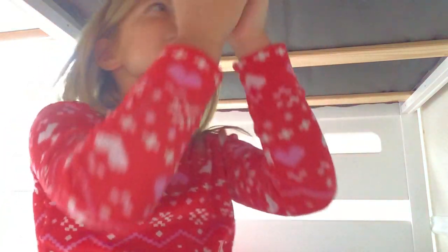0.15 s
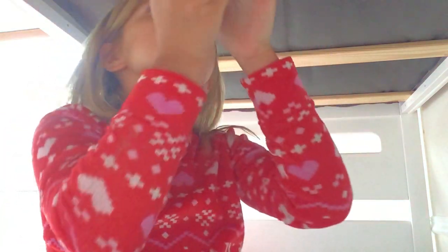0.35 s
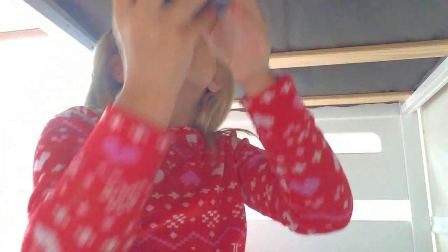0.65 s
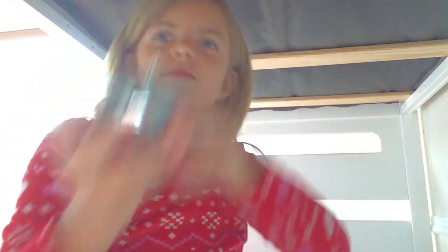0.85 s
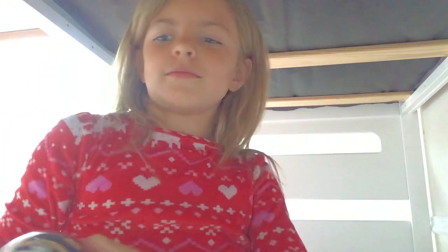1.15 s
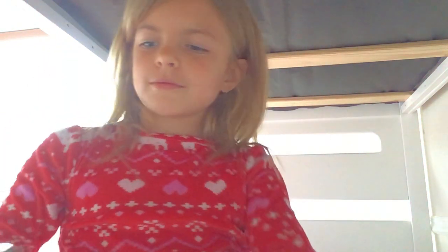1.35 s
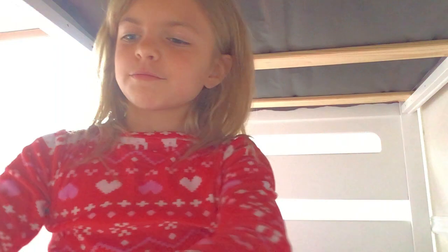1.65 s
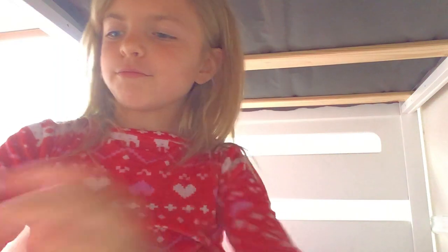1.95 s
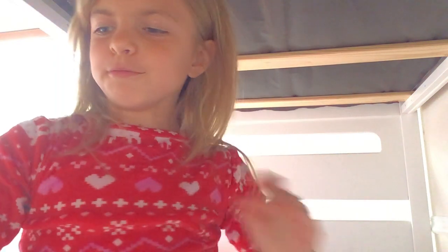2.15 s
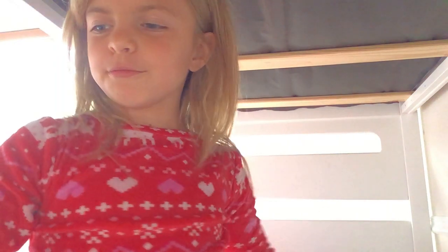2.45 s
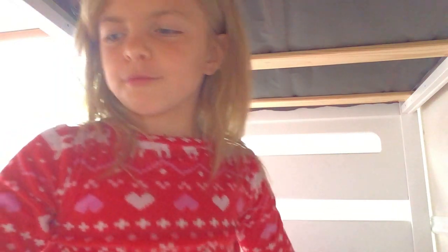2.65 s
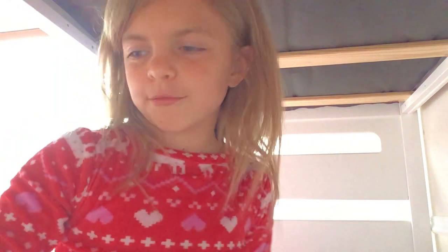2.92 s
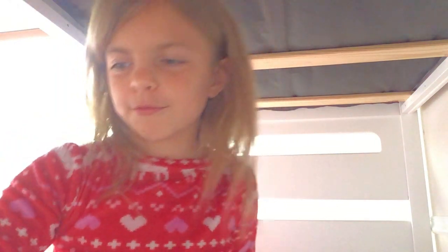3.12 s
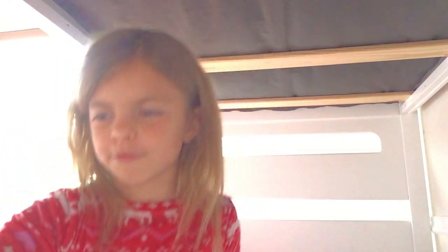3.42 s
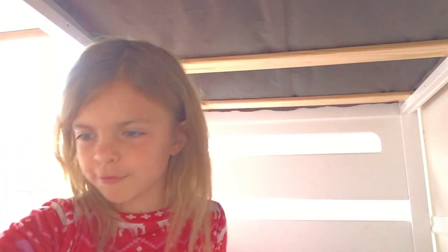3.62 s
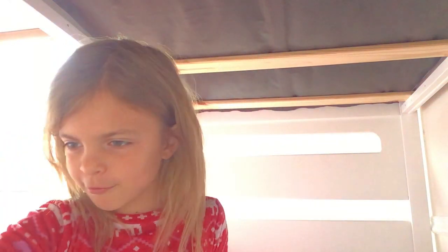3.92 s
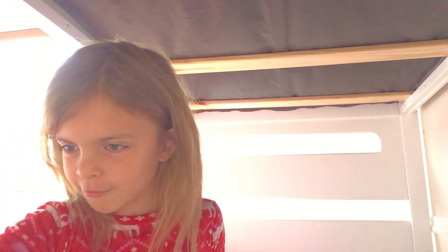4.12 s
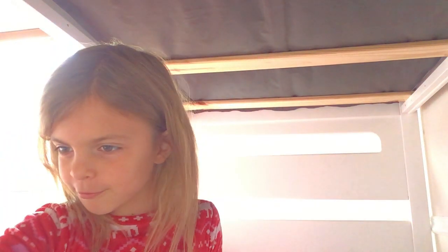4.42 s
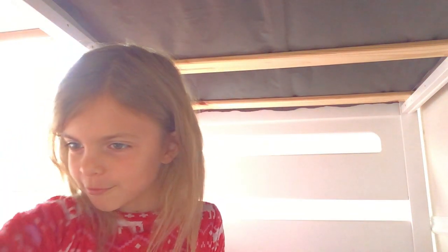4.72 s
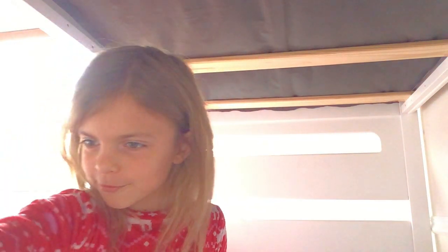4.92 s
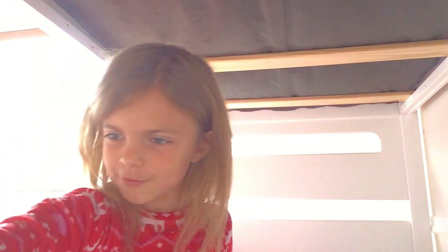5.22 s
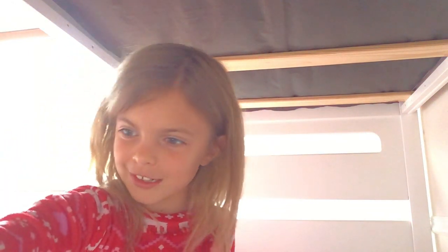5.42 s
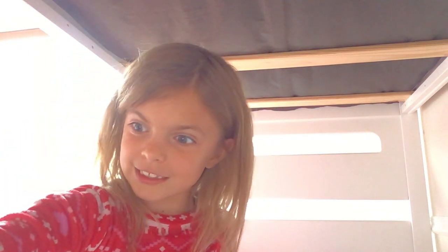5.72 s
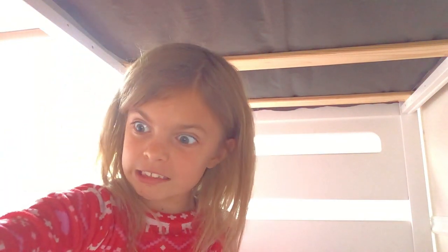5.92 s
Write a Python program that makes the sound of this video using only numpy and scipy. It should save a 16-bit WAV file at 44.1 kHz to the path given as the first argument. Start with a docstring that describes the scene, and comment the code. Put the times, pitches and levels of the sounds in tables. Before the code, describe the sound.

Fingers tick and clink on a metal desk bell near the microphone, over a faint low rumble and soft cloth rustle. Several dull knocks follow as it lands on a desk. Then come two sharp dings, one right after the other, and a long, clear ring that wavers and slowly dies down in the small room. Light handling clicks sound over the fading tone.

```python
"""First you hear a low room rumble, rustling cloth and a faint ringing as a steel desk bell is turned
in the hands. Fingers tick on its loose plunger (the button on top) and clink on its base. The bell is
set down with a few thumps of the desk, then struck twice in the small, quiet room. Its dome rings with
many pure tones; tones very close in pitch drift in and out of step, so the ring slowly pulses."""
import sys
import numpy as np
from scipy import signal
from scipy.fft import rfft, irfft, next_fast_len
from scipy.io import wavfile
from scipy.ndimage import uniform_filter1d

SR = 44100
rng = np.random.default_rng(int(sys.argv[2]) if len(sys.argv) > 2 else 0)


def wav_record(signal):
    """Record a signal, one row per channel, as 16-bit PCM in the file named by sys.argv[1]."""
    frames = np.transpose(np.atleast_2d(signal))
    bounded = np.clip(frames, -1, 1)
    # unit amplitude maps onto the largest positive 16-bit level
    quanta = np.round(bounded * 32767).astype(np.int16)
    wavfile.write(sys.argv[1], SR, quanta)


N = 267408

# Tone colour of the room noise: pitch_hz, relative_db
ROOM_NOISE_COLOUR = [(15, -71), (25, -47.5), (47, -13), (76, 5), (120, -11.5), (236, -17), (270, -17.5),
                     (373, -18.5), (516, -24), (936, -31), (1040, -38), (1560, -37.5), (2990, -50.5),
                     (6560, -50), (12500, -61.5), (16000, -73.5)]
# Loudness of the rumble over time: time_s, level_db
RUMBLE_LEVELS = [(0, -62.5), (.2, -58.5), (.6, -53), (.8, -56.5), (1.3, -56.5), (1.7, -53.5), (2.0, -56),
                 (2.2, -54), (2.55, -54), (3.2, -48), (3.6, -61.5), (4.1, -55), (4.85, -57.5),
                 (5.08, -51.5), (5.3, -54.5), (6.06, -51.5)]
# Faint hums: pitch_hz, width_hz, level_db
HUMS = [(376.9, 6.6, -70), (453, 12, -79)]
# Tone colour of the cloth hiss: pitch_hz, relative_db
CLOTH_COLOUR = [(710, -40), (1200, 1.5), (1670, -2), (2560, -19), (2860, 2.5), (3630, -3.5), (7150, 2),
                (13000, -35.5)]
# Loudness of that hiss over time: time_s, level_db
CLOTH_LEVELS = [(0, -72.5), (.3, -89), (.34, -75), (.5, -92), (1.0, -73), (2.1, -105), (2.6, -82),
                (2.78, -74), (2.81, -67), (2.92, -65), (3.15, -79.5), (3.44, -75.5), (3.55, -90)]
# Hands rubbing on the bell: start_s, end_s, pitch_hz, width_hz, level_db
SCUFFS = [(0, 0.29, 5870, 1200, -77), (.22, .5, 3930, 297, -79.5), (.73, 0.904, 2780, 497, -79),
          (.76, 1, 510, 294, -61), (1.37, 1.55, 3920, 200, -76.5), (2.28, 2.518, 1660, 2000, -61),
          (2.28, 2.558, 177, 80, -46.5), (5.3, 5.394, 6800, 300, -71), (5.36, 5.508, 1560, 496, -64),
          (5.36, 5.514, 690, 397, -64.5), (5.526, 5.641, 706, 500, -56), (5.578, 5.61, 8070, 300, -44),
          (5.601, 5.774, 8040, 400, -68)]
# The dome's tones, and how long after a strike each is in step: pitch_hz, in_step_s
DOME_TONES = [(1181.65, 0), (1221.04, 0), (3127.34, .205), (3131.39, .205), (5667.3, .135), (5670.45, .135),
              (8751.2, 0), (12359.2, 0), (8071, 0), (4351, 0), (2363, 0), (8751.0, 0)]
# Tones already ringing at the start, until a hand stops them: dome_row, level_db, stop_s
OPENING_TONES = [(0, -67, 0.36), (1, -70.5, 0.33), (3, -65, 0.14)]
# The desk's tones: pitch_hz
DESK_PITCHES = [132.8, 161.3, 198.9, 386, 600, 1080]
# How each one rings (ring_s is the time to fade by 60 dB): relative_db, ring_s
DESK_RINGS = [(-0.5, 0.25), (5, .12), (1.5, 0.13), (-10, 0.12), (-17, .09), (-18, .08)]
# The tones of the bell's base: pitch_hz
BASE_PITCHES = [3117, 5658, 7321, 8721, 8898, 9329, 10590, 14480]
# How each one rings: relative_db, ring_s
BASE_RINGS = [(-14, 0.13), (3.5, 0.17), (-13.5, 0.15), (-11, .1), (-1, .16), (-16, .1), (-26.5, .15),
              (-18.5, .15)]
# The plunger's tones: pitch_hz
PLUNGER_PITCHES = [5165, 5820, 5911, 7890, 8893, 9536, 9905, 10590, 11095]
# How each one rings: relative_db, ring_s
PLUNGER_RINGS = [(-9, .08), (-3.5, 0.14), (-9.5, .1), (-5, .12), (-15.5, .1), (-6.5, .12), (-2, 0.18),
                 (-18, .15), (-7, .15)]
# Fingers on the plunger: start_s, crack_db, pitch_hz, fall_s, plunger_db
FINGER_TICKS = [(.315, -70.5, 6000, .017, -90), (.464, -59, 7100, 0.012, -60),
                (0.6447, -69, 8000, .003, -58.5), (.686, -63, 8000, 0.0038, -53),
                (.765, -65.5, 5800, .01, -80), (.926, -58, 3700, 0.074, -66),
                (1.366, -51, 5000, 0.035, -75), (2.044, -45.5, 4000, 0.0058, -59),
                (2.443, -60, 3000, 0.0099, -66), (2.783, -50, 9200, 0.0058, -59),
                (5.338, -59.5, 4970, 0.016, -82), (5.389, -44, 10000, 0.008, -51),
                (5.465, -55, 7500, .007, -78), (5.505, -51.5, 7700, 0.01, -73),
                (5.554, -51.5, 6500, 0.011, -72), (5.57, -53, 7000, .01, -76),
                (5.583, -33, 7000, .005, -62), (5.7, -56, 6930, 0.0075, -77), (5.729, -58, 8000, .008, -85)]
# How long the room echoes: pitch_hz, ring_s
ECHO_TIMES = [(150, 0.48), (700, 0.57), (1800, 0.31), (5000, 0.27), (12000, .2)]
# A hit on the base: start_s, crack_db, pitch_hz, desk_db, base_db
BASE_CLINKS = [(.968, -41.5, 6360, -55.5, -31.5)]
# The bell or a hand landing on the desk: start_s, crack_db, pitch_hz, desk_db, tilt_db_per_octave
DESK_KNOCKS = [(1.827, -55.5, 1400, -57, 5), (2.03, -30, 1840, -35, 7), (2.144, -29, 3040, -27, 1),
               (2.19, -41.5, 1860, -35, -1), (2.226, -70, 2000, -50, 0), (2.33, -73, 1960, -48, -.6),
               (2.395, -52.5, 1730, -42, 0), (2.445, -61, 2000, -43.5, 1)]
# When the bell is struck: start_s
STRIKE_TIMES = [3.4955, 3.843]
# One push for each strike: strike_db, hand_before_s, hand_db, desk_db, spring_back_after_s
PLUNGER_PUSHES = [(-19.5, .0375, -36.5, -43, .119), (-17.5, .037, -44.5, -34.5, .131)]
# How each dome tone rings when struck: ring_s, first_strike_db, second_strike_db
DOME_RINGS = [(40.12, -50.5, -53.5), (22.5, -36, -38.5), (15, -42.5, -40), (8.99, -28, -29),
              (2.974, -24.5, -28.5), (2.79, -19.5, -21.5), (0.82, -11.5, -10), (0.4426, -25.5, -30.5),
              (.6, -59, -46), (2, -71.5, -60), (8, -78, -76), (1.3, -36, -33)]
# Tone pairs that drop a step while under a falling limit: pitch_hz, limit_db, fall_db_per_s, step_db
PAIR_STEPS = [(3129, -32.5, 1.9, -7.5), (5669, -23, 19.5, -5)]
# Brief jumps in the loudness of those pairs: pitch_hz, start_s, end_s, change_db
PAIR_JUMPS = [(3129, 3.51, 3.565, -5), (3129, 3.565, 3.64, -9.5), (3129, 4.73, 4.8, -6.5),
              (3129, 4.84, 4.95, 8), (3129, 4.98, 5.05, -5), (3129, 5.08, 5.2, 5.5),
              (5669, 3.48, 3.512, 19), (5669, 3.512, 3.53, 7), (5669, 3.54, 3.57, -11),
              (5669, 3.851, 3.868, 17), (5669, 3.872, 3.89, -14.5), (5669, 3.9, 3.99, -2),
              (5669, 5, 4.65, -5), (5669, 4.67, 4.74, 6), (5669, 5.22, 5.5, -9)]

SILENT_DB, AIR_DB = -np.inf, -59
TICK_RISE_S, TICK_DESK_DB, TICK_BASE_DB = 0.0016, -14.5, -22  # both levels are added to the crack's
KNOCK_RISE_S, KNOCK_FALL_S = 0.0031, 0.0086
METAL_HZ, METAL_RISE_S, METAL_FALL_S = 6800, .0008, 0.011


def gain(db):
    """Turns decibels into a number to multiply a sound by."""
    return 10 ** (np.asarray(db) / 20)


def normalise(sound):
    """Scales a sound to an average power of 1."""
    return sound / np.sqrt(np.mean(sound ** 2) + 1e-20)


def look_up(table, hz):
    """Reads a table between its rows, on a musical (logarithmic) pitch scale."""
    pitches, values = np.transpose(table)
    return np.interp(np.log(hz + 1), np.log(pitches + 1), values)


def loudness_curve(levels):
    """Joins rows of time_s, level_db into a gain for every sample."""
    return gain(np.interp(np.arange(N) / SR, *np.transpose(levels)))


def add(mix, start_s, sound):
    """Mixes a sound in at its start time."""
    part = mix[round(start_s * SR):][:len(sound)]
    part += sound[:len(part)]


def noise(colour, size=N):
    """Noise of power 1; colour(hz) says how strong each pitch is."""
    padded = next_fast_len(size, True)
    spectrum = rfft(rng.standard_normal(padded)) * colour(np.fft.rfftfreq(padded, 1 / SR))
    return normalise(irfft(spectrum, padded)[:size])


def narrow_noise(hz, width_hz, size=N):
    """Noise gathered around one pitch."""
    return noise(lambda f: 1 / (1 + (2 * (f - hz) / width_hz) ** 2), size)


def room_noise():
    """A rumble below about 110 Hz swells and sinks under steady air noise and wavering hums."""
    rumble = noise(lambda f: gain(look_up(ROOM_NOISE_COLOUR, f)) / (1 + (f / 110) ** 6))
    air = noise(lambda f: gain(look_up(ROOM_NOISE_COLOUR, f)) / (1 + (110 / (f + 1)) ** 6))
    hums = sum(gain(db) * narrow_noise(hz, width_hz) for hz, width_hz, db in HUMS)
    return loudness_curve(RUMBLE_LEVELS) * rumble + gain(AIR_DB) * air + hums


def rustle_and_scuffs():
    """Sleeves hiss as the arms move, and hands rub on the bell."""
    out = loudness_curve(CLOTH_LEVELS) * noise(lambda f: gain(look_up(CLOTH_COLOUR, f)))
    for start_s, end_s, hz, width_hz, db in SCUFFS:
        size = round((end_s - start_s) * SR)
        fade = signal.windows.tukey(size, .6)
        add(out, start_s, gain(db) * fade * narrow_noise(hz, width_hz, size))
    return out


def opening_ring():
    """The dome is already ringing faintly; a hand damps it by 114 dB a second."""
    t = np.arange(N) / SR
    return sum(gain(db - 114 * np.maximum(t - stop_s, 0)) * np.sin(2 * np.pi * DOME_TONES[round(i)][0] * t)
               for i, db, stop_s in OPENING_TONES)


def ring(pitches, rings, push, tilt_db=0):
    """A push sets an object's tones ringing; each octave up is tilt_db louder."""
    t = np.arange(SR // 3) / SR
    tones = sum(gain(db + tilt_db * np.log2(hz / pitches[0]) - 60 * t / ring_s)
                * np.sin(2 * np.pi * hz * t) for hz, (db, ring_s) in zip(pitches, rings))
    return signal.fftconvolve(tones, push / np.linalg.norm(push))


def tap(start_s, crack_db, hz, rise_s, fall_s,
        desk_db=SILENT_DB, base_db=SILENT_DB, plunger_db=SILENT_DB, tilt_db=0):
    """One touch gives two tracks: a crack of noise, and the ringing of desk, base and plunger."""
    cracks, rings = np.zeros((2, N))
    t = np.arange(4096) / SR
    shape = np.minimum(t / rise_s, 1) ** 2 * np.exp(-np.maximum(t - rise_s, 0) / fall_s)
    # Random bumps in the spectrum give each crack a slightly different colour.
    bumps_db = 2.5 * normalise(uniform_filter1d(rng.standard_normal(len(t) // 2 + 1), size=20))

    def crack_colour(f):
        """A broad hump near hz, with the highest treble softened."""
        hump = (f / hz) ** 1.73 / (1 + (f / hz) ** 3.31)
        return gain(bumps_db) * hump / (1 + (f / (2.1 * hz)) ** 4) / (1 + (f / 12000) ** 4.5)

    add(cracks, start_s, gain(crack_db) * noise(crack_colour, len(t)) * shape)
    thump = ring(DESK_PITCHES, DESK_RINGS, np.ones(1), tilt_db)
    swell = 1 - np.exp(-(np.arange(len(thump)) / SR / 0.006) ** 2)  # the heavy desk is slow to move
    add(rings, start_s, gain(desk_db) * thump * swell)
    rattle = rng.standard_normal(len(t)) * shape ** 0.51
    rattle[round(rise_s * SR / 2)] += 0.89 * np.linalg.norm(rattle)  # one clean tick leads the rattle
    add(rings, start_s, gain(base_db) * ring(BASE_PITCHES, BASE_RINGS, rattle))
    add(rings, start_s, gain(plunger_db) * ring(PLUNGER_PITCHES, PLUNGER_RINGS, rattle))
    return np.array([cracks, rings])


def finger_ticks():
    """Fingers rattle the loose plunger; the desk and base ring along."""
    return sum(tap(start_s, db, hz, TICK_RISE_S, fall_s, db + TICK_DESK_DB, db + TICK_BASE_DB, plunger_db)
               for start_s, db, hz, fall_s, plunger_db in FINGER_TICKS)


def room_echo(sound):
    """The room returns many scattered echoes; each pitch fades at its own speed."""
    echoes = np.zeros(SR // 2)
    slots = np.arange(100, len(echoes) - 20, 20)
    echoes[slots + rng.integers(0, 20, len(slots))] = rng.choice([-1., 1.], len(slots))
    hz, t, spectrum = signal.stft(echoes, SR, nperseg=256)
    fade = gain(-60 * t / look_up(ECHO_TIMES, hz)[:, None])
    tail = signal.istft(spectrum * fade, SR, nperseg=256)[1]
    return signal.fftconvolve(sound, tail / np.linalg.norm(tail))[:N]


def base_clink():
    """The metal base is bumped in the hands and rings briefly."""
    return sum(tap(start_s, db, hz, METAL_RISE_S, METAL_FALL_S, desk_db, base_db)
               for start_s, db, hz, desk_db, base_db in BASE_CLINKS)


def desk_knocks():
    """The desk thumps when the bell or a hand lands on it."""
    return sum(tap(start_s, db, hz, KNOCK_RISE_S, KNOCK_FALL_S, desk_db, tilt_db=tilt_db)
               for start_s, db, hz, desk_db, tilt_db in DESK_KNOCKS)


def plunger_pushes():
    """Four taps a push: the hand lands, the clapper hits, the desk thuds, the plunger springs back."""
    out = np.zeros((2, N))
    for strike_s, (db, before_s, hand_db, desk_db, after_s) in zip(STRIKE_TIMES, PLUNGER_PUSHES):
        out += tap(strike_s - before_s, hand_db, METAL_HZ, TICK_RISE_S, METAL_FALL_S, desk_db,
                   base_db=hand_db + TICK_BASE_DB, plunger_db=hand_db + TICK_BASE_DB)
        out += tap(strike_s - METAL_RISE_S, db, METAL_HZ, METAL_RISE_S, METAL_FALL_S,
                   base_db=db - 2, plunger_db=db - 24)
        out += tap(strike_s + 0.0032, crack_db=-24, hz=1910, rise_s=KNOCK_RISE_S, fall_s=KNOCK_FALL_S,
                   desk_db=-28.5)
        out += tap(strike_s + after_s, crack_db=-37, hz=METAL_HZ, rise_s=.005, fall_s=METAL_FALL_S,
                   desk_db=-47.5, plunger_db=-60)
    return out


def pair_flicker(pair, hz, limit_db, fall_db_per_s, step_db):
    """A gain that makes a pair of tones dip when it is quiet, jump briefly and flutter."""
    t = np.arange(N) / SR
    age_s = t - np.where(t < STRIKE_TIMES[1], *STRIKE_TIMES)
    under_db = limit_db - fall_db_per_s * age_s - 20 * np.log10(abs(pair) + 1e-9)
    dip_db = step_db * (1 + np.tanh(under_db / .8)) / 2
    jumps_db = sum(db * (t > start_s) * (t < end_s)
                   for pair_hz, start_s, end_s, db in PAIR_JUMPS if abs(pair_hz - hz) < 400)
    flutter_db = 1.28 * noise(lambda f: (f / 25) / (1 + (f / 25) ** 3))
    return uniform_filter1d(gain(dip_db + jumps_db), size=400) * gain(flutter_db)


def dome_ring():
    """Each time the clapper touches the rim, it stops the old ring and starts a new one."""
    t = np.arange(N) / SR
    tones = np.zeros((len(DOME_RINGS), N), complex)  # abs() is the strength, .imag is the sound
    for tone, (hz, in_step_s), (ring_s, *strikes_db) in zip(tones, DOME_TONES, DOME_RINGS):
        for start_s, end_s, db in zip(STRIKE_TIMES, STRIKE_TIMES[1:] + [np.inf], strikes_db):
            age_s = t[round(start_s * SR):] - start_s
            swell = 1 - np.exp(-age_s * hz / 14)  # builds up over about 14 vibrations
            stop = np.exp(-np.maximum(age_s + start_s - end_s, 0) / 0.0047)
            wave = np.exp(2j * np.pi * hz * (age_s - in_step_s))
            add(tone, start_s, gain(db - 60 * age_s / ring_s) * swell * stop * wave)
    for hz, *step in PAIR_STEPS:
        pair = abs(np.array(DOME_TONES)[:, 0] - hz) < 9  # the two tones within 9 Hz of this pitch
        tones[pair] *= pair_flicker(tones[pair].sum(0), hz, *step)
    return tones.imag.sum(0)


def scene():
    """All the sounds at one microphone; only the taps get an echo."""
    cracks, rings = finger_ticks() + desk_knocks() + base_clink() + plunger_pushes()
    dome = opening_ring() + dome_ring()
    echoes = gain(-6.5) * room_echo(cracks) + gain(-7.0) * room_echo(rings)
    return (dome + rings + cracks + echoes + room_noise() + rustle_and_scuffs())[None]


def record(dry):
    """The microphone loses bass below 42 Hz, and treble above 16400 Hz is cut off."""
    bass_cut = signal.butter(3, 42, "high", fs=SR, output="sos")
    treble_cut = signal.firwin(511, 16400, window=("kaiser", 9), fs=SR)
    return signal.oaconvolve(signal.sosfilt(bass_cut, dry), treble_cut[None], "same")


dry = scene()
out = record(dry)
wav_record(out)
```